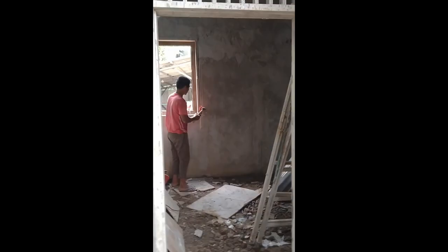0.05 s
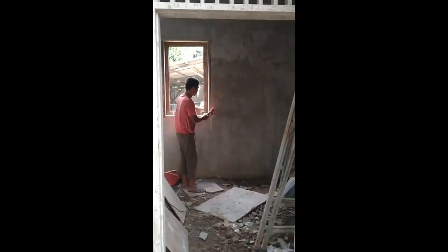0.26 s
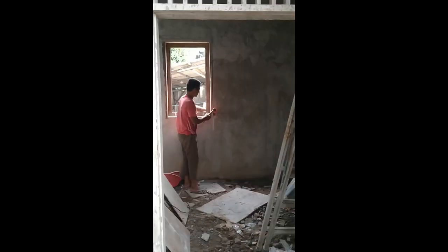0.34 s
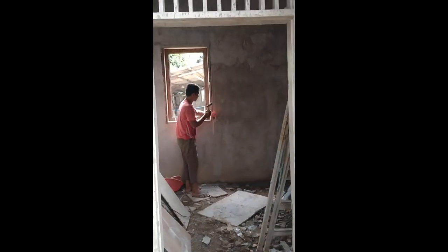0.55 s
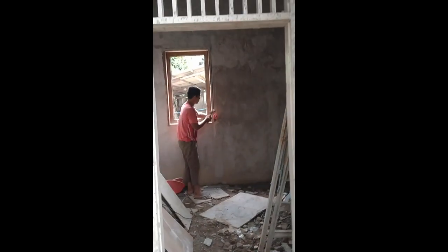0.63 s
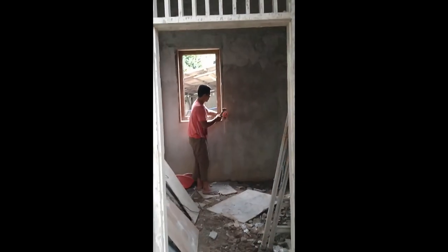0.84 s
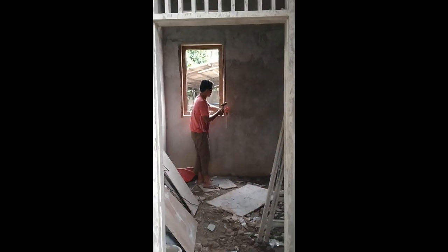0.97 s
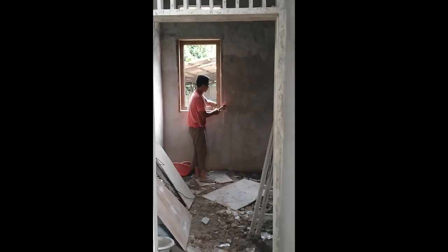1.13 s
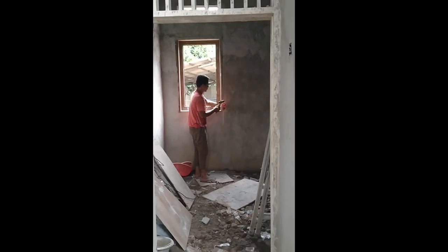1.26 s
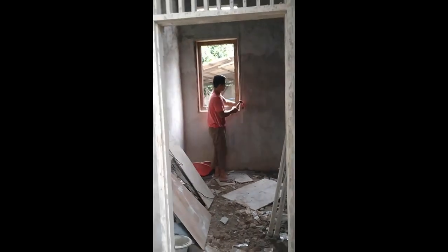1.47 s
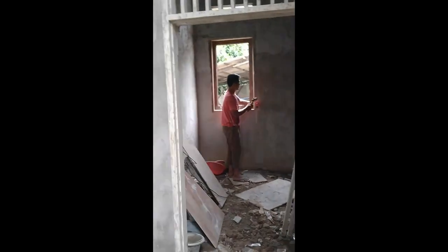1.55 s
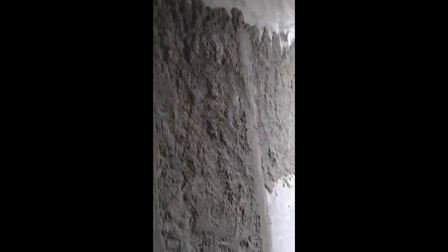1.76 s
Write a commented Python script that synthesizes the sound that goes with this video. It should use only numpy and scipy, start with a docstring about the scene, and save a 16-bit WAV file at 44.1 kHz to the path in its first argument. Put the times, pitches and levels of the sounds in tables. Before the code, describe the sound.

After a faint gritty scrape, four sharp hammer blows hit a chisel against plaster, ringing thinly and echoing briefly in an unfinished room. Heard from a few metres away, with small chips falling between strikes over a quiet outdoor rumble.

```python
"""A bare masonry room hums briefly over outdoor rumble, and grit scrapes under a steel chisel.
From 0.25 s a hammer, a few metres away, drives the chisel into the plastered wall with four blows.
Each is a dry crack with a thin steel ring; a limiter ducks on it, so the room's wash and low boom
swell back afterwards. Between blows the tip is reset and grit trickles. At 1.63 s all stops abruptly."""
import sys
import numpy as np
from scipy import signal
from scipy.fft import rfft, irfft
from scipy.io import wavfile
from scipy.ndimage import uniform_filter1d, minimum_filter1d

SR = 44100
rng = np.random.default_rng(int(sys.argv[2]) if len(sys.argv) > 2 else 0)


def dump(signal):
    """Clip the signal to [-1, 1] and save it as 16-bit WAV at the path in sys.argv[1]."""
    limited = np.clip(np.atleast_2d(signal).T, -1, 1)
    pcm = np.round(limited * 32767).astype(np.int16)
    wavfile.write(sys.argv[1], SR, pcm)


N = 79380
HZ = np.fft.rfftfreq(2 ** 15, 1 / SR)  # frequency axis of the filters
T = np.arange(len(HZ) * 2 - 2) / SR  # time axis of one event

SPOT_WIDTH_HZ, SPOT_LOW_DB, SPOT_HIGH_DB, SPOT_RING_DB, SPOT_T60_S = 90, 6, 7.5, -10.5, .035
THUD_HZ, THUD_WIDTH_HZ = 288, 83
# hammer blows (time [s], crack [dB], crack t60 [s], room [dB], boom [dB], hollow thud [dB],
# brightness [dB], share of steel ring [0-1], lower and upper resonance of the struck spot [Hz],
# clack pitch [Hz], clack against crack [dB])
BLOWS = [(0.2472, -14, 0.049, -17, -15.5, 6.5, -8.5, 0.53, 1242, 1600, 2440, 2),
         (0.7259, -3.5, 0.013, -12, -8.5, 0, 3, 0.85, 857, 1310, 2228, 0.5),
         (1.0921, -10.5, 0.061, -12.5, -9.5, -2, 3.5, 0.67, 1067, 1800, 2482, 0),
         (1.395, -6.5, .036, -12, -17.5, -5, 1.5, 1, 1000, 1560, 2276, 0)]
def hammer():
    """Impact excitation: each blow drives the modes of the tool, the struck spot and the room."""
    out = np.zeros(N)
    for (s, crack_db, t60, room_db, boom_db, thud_db,
         bright_db, ring, low_hz, high_hz, clack_hz, clack_db) in BLOWS:
        spot = SPOT_LOW_DB * bump(low_hz, SPOT_WIDTH_HZ) + SPOT_HIGH_DB * bump(high_hz, SPOT_WIDTH_HZ)
        colour = tool_colour(ring) + spot + thud_db * bump(THUD_HZ, THUD_WIDTH_HZ) + bright_db * treble()
        spot_ring = ringing([(hz, SPOT_RING_DB, SPOT_T60_S) for hz in (low_hz, high_hz)])
        contact = direct_crack(t60, colour) + amp(clack_db) * clack(clack_hz) + spot_ring
        after_ring = amp(thud_db) * hollow_thud() + ring * amp(bright_db) * chisel()
        add(out, s, amp(crack_db) * contact)
        add(out, s, amp(room_db) * (coloured(wash(), colour) + after_ring))
        add(out, s, amp(boom_db) * boom())
    return out


SNAP_DB, SNAP_T60_S = 1.5, .012
def crack(t60):
    """Broadband transient: the snap of first contact and a dense burst of crushing plaster."""
    return rng.choice([-1., 1.], len(T)) * (fade(t60) + amp(SNAP_DB) * fade(SNAP_T60_S))


# spectrum of the direct sound against the room's wash (frequency [Hz], gain [dB])
DIRECT_SPECTRUM = [(100, -22.5), (400, -7.5), (1000, -8.5), (2200, -1.5), (5000, 7.5), (9000, -1.5),
                   (15000, 4)]
def direct_crack(t60, colour):
    """Direct field: the crack arrives brighter than the reverberation."""
    return coloured(crack(t60), colour + along(DIRECT_SPECTRUM, HZ))


# modes of the clack (frequency [multiple of pitch], level [dB], t60 [s])
CLACK_MODES = [(.76, -7, 0.028), (1, 1.5, 0.017), (1.24, -7, 0.016), (1.78, -6.5, 0.0073),
               (2.5, -10.5, 0.021)]
def clack(pitch_hz):
    """Heavy damping: inharmonic modes die within hundredths of a second."""
    return ringing([(ratio * pitch_hz, db, t60) for ratio, db, t60 in CLACK_MODES])


PING_HZ, PING_RING_DB, PING_T60_S = 15000, -18, .17  # the steel's highest mode
# modes of the chisel (frequency [Hz], relative level [dB], t60 [s])
CHISEL_MODES = [(8500, -27.5, 0.28), (10700, -29, .29), (11950, -26.5, 0.25)]
def chisel():
    """Free vibration: lightly damped steel keeps a thin, high ring."""
    return ringing(CHISEL_MODES + [(PING_HZ, PING_RING_DB, PING_T60_S)])


# modes of the hollow wall (frequency [Hz], level [dB], t60 [s])
HOLLOW_MODES = [(203.4, -18, 0.27), (271.2, -10.5, .15), (382.6, -11, .13)]
def hollow_thud():
    """Damped resonance: the hollow wall answers with a short, low knock."""
    return ringing(HOLLOW_MODES)


PING_WIDTH_HZ, PING_LIFT_DB = 150, 22
# broad spectrum of the struck wall (frequency [Hz], gain [dB])
WALL_SPECTRUM = [(30, -3.5), (55, 4), (100, -1), (200, -1.5), (350, -4), (650, -1.5), (1000, 2.5),
                 (1500, -2), (2000, -5), (3300, -10), (4500, -12.5), (5500, -17), (7500, -15.5),
                 (10000, -21.5), (14000, -19.5), (16000, -24.5)]
# resonances of chisel and hammer (frequency [Hz], width [Hz], full lift [dB])
STEEL_PEAKS = [(2350, 110, 6), (2850, 110, 2.5), (3800, 150, 4.5), (4313, 190, 7.5), (5700, 210, 4),
               (8160, 420, 13.5), (9070, 99, 9.5), (10640, 82, 13), (12267, 630, 14.5)]
def tool_colour(ring):
    """Frequency response in dB: a share of the steel's resonances stands on the wall's spectrum."""
    steel = sum(db * bump(hz, width) for hz, width, db in STEEL_PEAKS)
    ping = PING_LIFT_DB * bump(PING_HZ, PING_WIDTH_HZ)
    return along(WALL_SPECTRUM, HZ) + ring * (steel + ping)


BUILD_S, BASS_BUILD_S, BASS_HZ = .0025, .048, 110
# reverberation time of the room (frequency [Hz], t60 [s])
ROOM_T60 = [(60, 0.73), (120, 0.52), (250, 0.57), (600, 0.39), (1300, 0.36), (3000, .32), (8000, 0.24),
            (15000, 0.2)]
def wash():
    """Diffuse field: it builds up, slower in the bass, then each frequency decays at its own rate."""
    hz, t, spectrum = signal.stft(rng.standard_normal(len(T)), SR, nperseg=512)
    hz = hz[:, None]
    rise_s = BUILD_S + BASS_BUILD_S / (1 + (hz / BASS_HZ) ** 2)
    decay = np.exp(-np.log(1000) * t / along(ROOM_T60, hz))
    return signal.istft(spectrum * decay * (1 - np.exp(-t / rise_s)), SR, nperseg=512)[1][:len(T)]


# low modes of the room (frequency [Hz], level [dB], t60 [s], rise time [s])
ROOM_MODES = [(53.74, -12, 0.5, 0.057), (86.2, -23, .6, 0.042), (192, -19, .45, .02),
              (253, -22.5, 0.49, 0.026), (373, -27, 0.26, 0.018), (583.3, -16.5, 0.37, .01)]
def boom():
    """Standing waves: low modes between the walls swell and linger."""
    return sum(amp(db) * fade(t60) * (1 - np.exp(-T / rise)) * np.sin(2 * np.pi * (hz * T + rng.random()))
               for hz, db, t60, rise in ROOM_MODES)


# touches of the tip and falling chips (time [s], level [dB], brightness [dB], room against contact [dB])
LIGHT_CONTACTS = [(.463, -67, 22, -11), (.602, -57, 9, 2.5), (.938, -50, 33.5, -7.5),
                  (.956, -64.5, 22.5, -6), (.982, -57.5, 41.5, -2), (1.316, -67, 25.5, 1.5),
                  (1.369, -56.5, 19.5, -17)]
def taps():
    """Weak impacts: small contacts excite the same wall and room."""
    out = np.zeros(N)
    for s, db, bright_db, room_db in LIGHT_CONTACTS:
        contact = crack(t60=.017) + amp(room_db) * wash()
        add(out, s, amp(db) * coloured(contact, along(WALL_SPECTRUM, HZ) + bright_db * treble()))
    return out


GRAINS_PER_S, GRAIN_SPREAD_DB, GRIT_ROOM_DB = 980, .5, 1
# envelope of the grit (time [s], level [dB])
GRIT_LEVEL = [(0, -61), (.10, -65), (.155, -51.5), (0.204, -52.5), (.24, -60.5), (.45, -69), (.58, -77.5),
              (.68, -64.5), (.88, -71.5), (.95, -78), (1.02, -61.5), (1.08, -76.5), (1.29, -67.5),
              (1.38, -63), (1.45, -72), (1.62, -75)]
# spectrum of the grit (frequency [Hz], gain [dB])
GRIT_SPECTRUM = [(200, -9), (1000, -2.5), (2500, 4.5), (5500, -6.5), (8300, 3), (10500, -8.5),
                 (12500, -5.5), (15500, 5.5)]
def grit():
    """Shot noise: grains scrape under the tip and trickle down the wall as random impulses."""
    grains = (rng.random(N) < GRAINS_PER_S / SR) * rng.standard_normal(N)
    grains *= amp(GRAIN_SPREAD_DB * rng.standard_normal(N))
    sand = unit(grains) + amp(GRIT_ROOM_DB) * unit(signal.fftconvolve(grains, wash())[:N])
    level_db = np.interp(np.arange(N) / SR, *np.transpose(GRIT_LEVEL))
    return unit(coloured(sand, along(GRIT_SPECTRUM, HZ))) * amp(level_db)


RUMBLE_DB = -56
# room resonance sounding at the start (frequency [Hz], level [dB], t60 [s])
OPENING_MODE = (141, -46.5, 0.34)
# spectrum of the outdoor rumble (frequency [Hz], gain [dB])
RUMBLE_SPECTRUM = [(20, -2.5), (55, 4), (85, 1), (130, -5.5), (200, -5), (300, -9), (600, -20.5),
                   (1500, -20.5), (3000, -31), (6000, -41), (8300, -38), (16000, -43.5)]
def background():
    """Ambient noise: steady rumble enters by the open window while one low room mode dies away."""
    out = amp(RUMBLE_DB) * unit(coloured(rng.standard_normal(N), along(RUMBLE_SPECTRUM, HZ)))
    add(out, 0, ringing([OPENING_MODE]))
    return out


def amp(db):
    """Decibels to amplitude ratio."""
    return 10 ** (np.asarray(db) / 20)


def unit(x):
    """Normalisation to rms 1."""
    return x / np.sqrt(np.mean(x ** 2) + 1e-20)


def along(points, hz):
    """Interpolation of (frequency [Hz], value) points on a log axis."""
    f, v = np.transpose(points)
    return np.interp(np.log(hz + 1), np.log(f + 1), v)


def bump(hz, width_hz):
    """Gaussian peak of height 1."""
    return np.exp(-.5 * ((HZ - hz) / width_hz) ** 2)


def treble(corner_hz=6910):
    """High shelf, from 0 in the bass to 1 in the treble."""
    return HZ ** 2 / (HZ ** 2 + corner_hz ** 2)


def coloured(x, db):
    """Minimum-phase filter shaped by a dB curve; white noise keeps its level."""
    cepstrum = irfft(np.log(unit(amp(db))))
    cepstrum[1:len(HZ) - 1] *= 2  # folding onto positive time makes the filter causal
    cepstrum[len(HZ):] = 0
    return signal.fftconvolve(x, irfft(np.exp(rfft(cepstrum))))[:len(x)]


def fade(t60):
    """Exponential decay by 60 dB in t60 seconds."""
    return np.exp(-np.log(1000) * T / t60)


def ringing(modes):
    """Modal sum of damped sines (frequency [Hz], level [dB], t60 [s])."""
    return sum(amp(db) * fade(t60) * np.sin(2 * np.pi * hz * T) for hz, db, t60 in modes)


def add(out, s, x):
    """Superposition of x onto out from time s."""
    i = round(s * SR)
    out[i:i + len(x)] += x[:N - i]


def scene():
    """Superposition: all sources sum at one microphone."""
    return (hammer() + taps() + grit() + background())[None]


def recover(need_db, hold_s, db_per_s):
    """Hold and release: the gain in dB drops at once, waits, then climbs back steadily."""
    half = int(hold_s * SR) // 2
    held_db = minimum_filter1d(need_db, 2 * half + 1, origin=half)
    climb_db = db_per_s * np.arange(N) / SR
    return np.minimum.accumulate(held_db - climb_db) + climb_db


LIMIT_DB, SENSE_HZ, SENSE_S, LOOK_AHEAD_S, CEILING_DB, LATE_SHARE = -27.5, 8900, .002, .001, -7.5, .42
def limiter(x):
    """Side-chain limiting: treble peaks cut the gain; part creeps back, part waits and snaps back."""
    high = irfft(rfft(x) * (np.fft.rfftfreq(N, 1 / SR) > SENSE_HZ), N)
    level_db = 10 * np.log10(np.abs(uniform_filter1d(high ** 2, int(SENSE_S * SR))) + 1e-14)
    need_db = np.minimum(LIMIT_DB - level_db, 0)
    steady_db = recover(need_db, hold_s=.012, db_per_s=240.5)
    late_db = recover(need_db, hold_s=.05, db_per_s=1799.5)
    gain_db = (1 - LATE_SHARE) * steady_db + LATE_SHARE * late_db
    ducked = x * amp(np.roll(gain_db, -int(LOOK_AHEAD_S * SR)))
    return ducked / (1 + (ducked / amp(CEILING_DB)) ** 4) ** .25  # soft clipping


END_S, TOP_HZ = 1.628, 15900
def record(dry):
    """Signal chain: limiter, abrupt stop and band limit."""
    x = limiter(dry[0]) * (np.arange(N) / SR < END_S)
    return irfft(rfft(x) * (np.fft.rfftfreq(N, 1 / SR) < TOP_HZ), N)[None]


dry = scene()
out = record(dry)
dump(out)
```